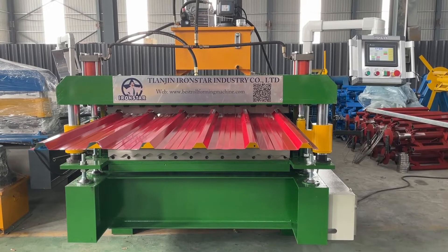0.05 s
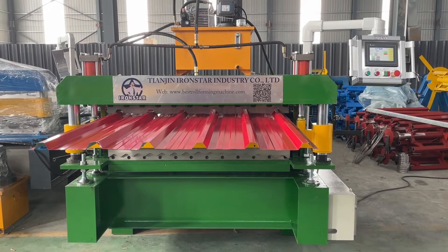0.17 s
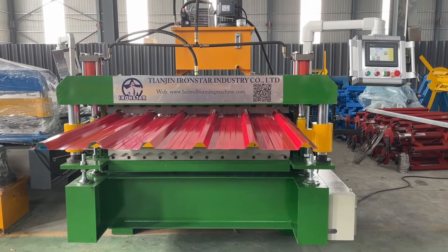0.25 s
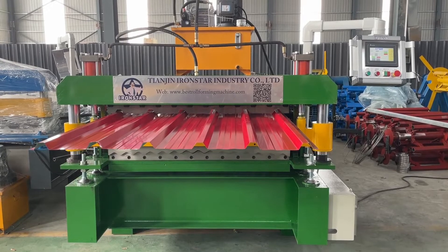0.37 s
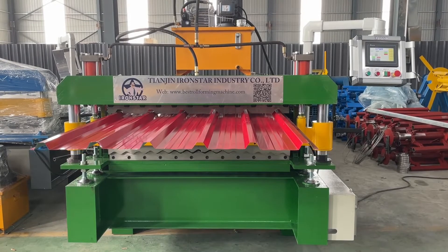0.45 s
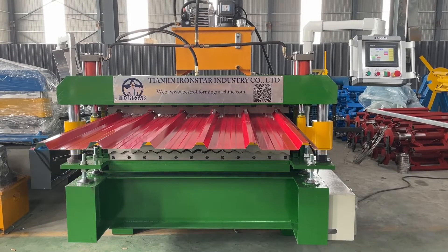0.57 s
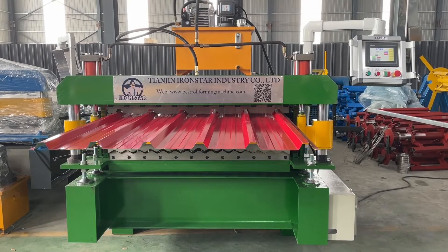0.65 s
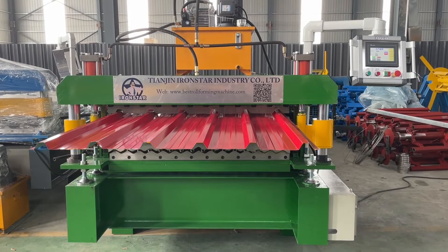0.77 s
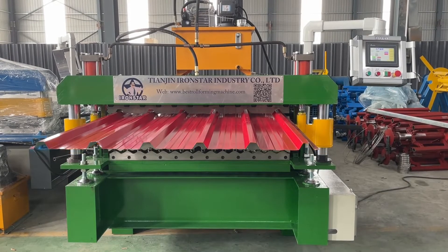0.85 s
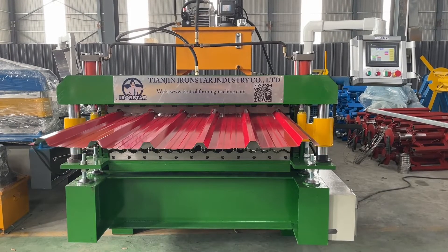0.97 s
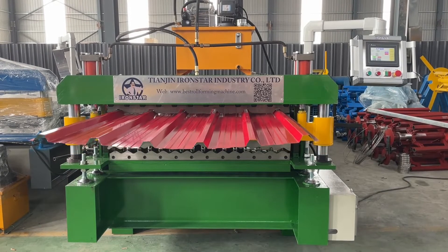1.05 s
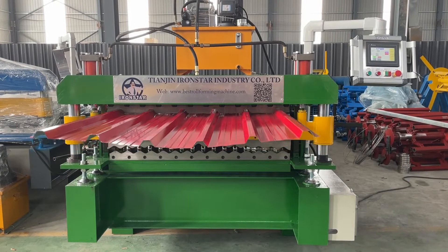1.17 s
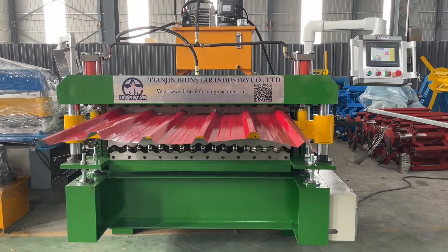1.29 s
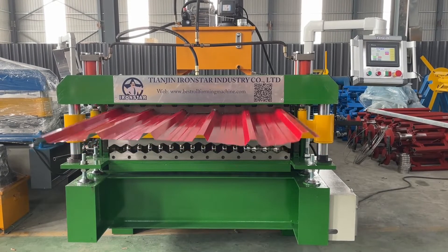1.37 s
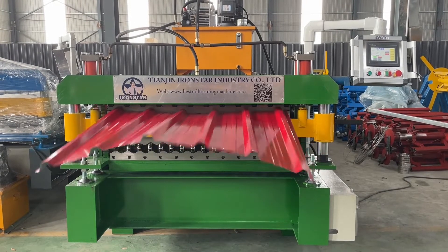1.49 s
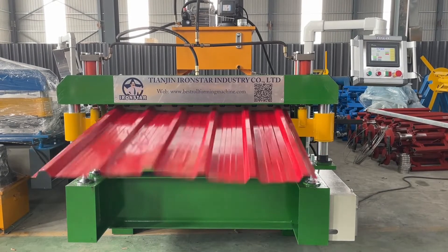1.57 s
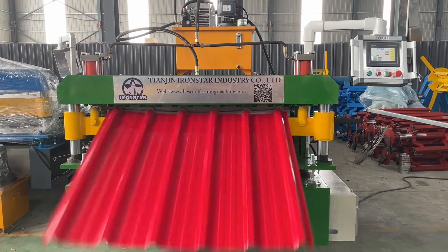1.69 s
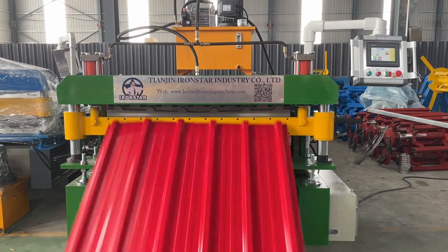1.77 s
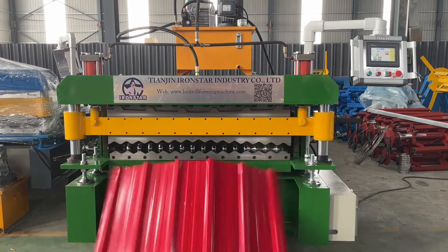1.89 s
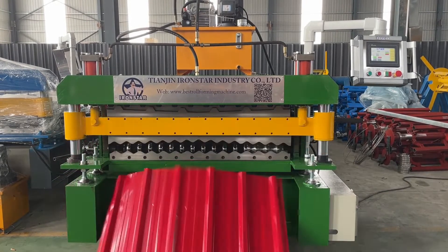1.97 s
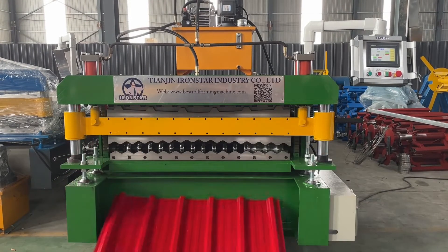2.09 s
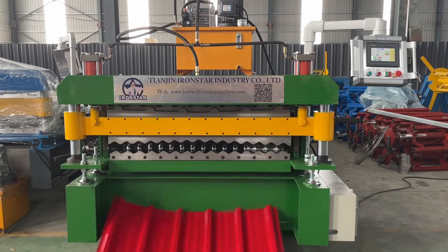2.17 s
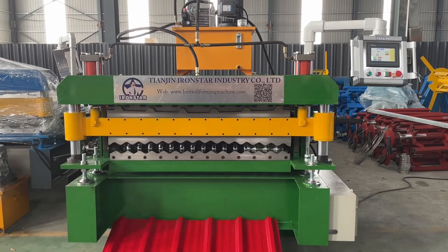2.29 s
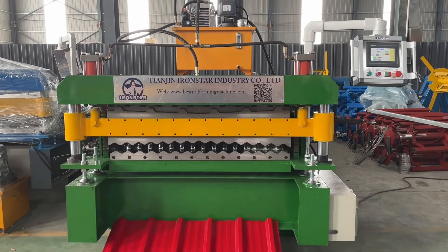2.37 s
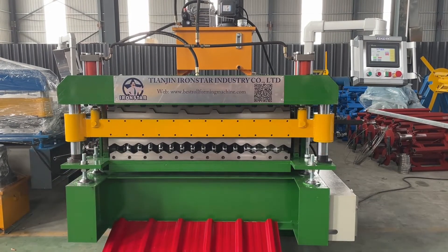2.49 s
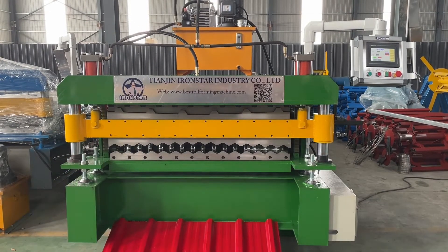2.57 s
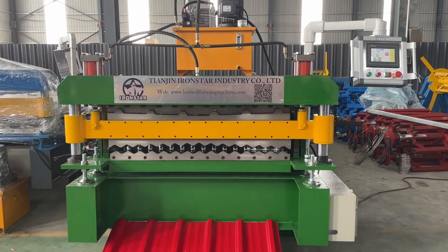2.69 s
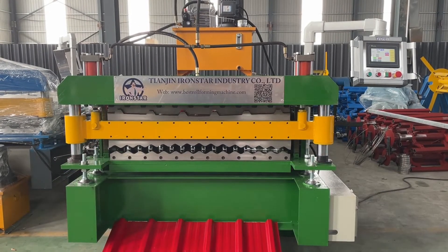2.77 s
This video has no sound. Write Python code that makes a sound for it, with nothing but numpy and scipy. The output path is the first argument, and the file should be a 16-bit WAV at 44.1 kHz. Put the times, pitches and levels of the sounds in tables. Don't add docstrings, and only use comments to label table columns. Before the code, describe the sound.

A thin steel roofing panel drops off a humming forming machine, clattering and ringing in a factory hall

```python
import sys
import numpy as np
from scipy import signal
from scipy.fft import rfft, irfft, next_fast_len
from scipy.io import wavfile

SR = 44100
rng = np.random.default_rng(int(sys.argv[2]) if len(sys.argv) > 2 else 0)


def transcribe(u):
    v = np.clip(np.atleast_2d(u).T, -1, 1)
    q = np.round(v * 32767).astype(np.int16)
    wavfile.write(sys.argv[1], SR, q)


def boost_factor(decibels):
    exponent = np.asarray(decibels, float) / 20
    return 10 ** exponent


N = 125685


def rms_one(x):
    return x / np.sqrt(np.mean(x ** 2) + 1e-20)


def in_time(rows):
    s, *columns = np.transpose(rows)
    return [np.interp(np.arange(N) / SR, s, c) for c in columns]


def at_hz(rows, hz, column=1):
    rows = np.array(rows)
    return np.interp(np.log(hz), np.log(rows[:, 0]), rows[:, column])


def drift(rate):
    pole = np.exp(-80 * np.pi * rate / SR)
    white = rng.standard_normal(N // 40 + 2002)
    slow = signal.lfilter([1], [1, -2 * pole, pole * pole], white)[2000:]
    return np.interp(np.arange(N) / 40, np.arange(len(slow)), rms_one(slow))


def butter(x, hz, kind, order=2):
    return signal.sosfilt(signal.butter(order, hz, kind, fs=SR, output="sos"), x)


def ring(x, hz, t60):
    r = boost_factor(-60 / (max(t60, .01) * SR))
    w = 2 * np.pi * hz / SR
    return signal.lfilter([0, np.sin(w)], [1, -2 * r * np.cos(w), r * r], x + 1e-18)


# pitch_hz, panel_likeness, machine_likeness
LIKENESS = [(60, 1, 0.92), (205, 1, 1), (410, 0.94, 0.38), (770, 0.92, 0.47), (1600, 0.27, 0.087),
            (3000, 0.75, 0.82), (8000, .98, .98), (15800, 0.93, 0.66)]


def bands(size, column):
    edges = 32 * 2 ** np.arange(0, 9.3, .5)
    white = rng.standard_normal((2, 2, size))
    for k, (low, high) in enumerate(zip(edges, edges[1:])):
        mid, side = butter(white[k % 2], [low, high], "band")
        hz = np.sqrt(low * high)
        alike = np.clip(at_hz(LIKENESS, hz, column=column), 0, 1)
        yield hz, np.sqrt(1 + alike) * mid + np.sqrt(1 - alike) * side * [[1], [-1]]


# time_s, noise_db, rumble_db
DRIVE_LOAD = [(0, -31.5, -34), (.15, -32.5, -31), (.24, -32, -33), (.4, -32, -32), (.7, -32, -26),
              (.9, -32, -33.5), (1.07, -30.5, -33), (1.2, -28, -26), (1.5, -23.5, -40.5), (1.9, -37.5, -34),
              (2.3, -34, -43), (2.55, -31, -66), (2.85, -42.5, -50)]
# pitch_hz, density_db (per Hz)
MACHINE_COLOUR = [(100, -7.5), (250, -3.5), (600, -6), (1300, -8.5), (3000, -17.5), (6000, -24.5),
                  (9000, -17), (16000, -25.5)]
# pitch_hz, width_hz, level_db, slope_db_per_s
GEARS = [(168, 9.6, -35.5, -3), (565.5, 15.5, -48.5, 8.5), (622.7, 4.6, -38, -12), (736, 14, -54.5, 0),
         (2190, 250, -40.5, -21), (3890, 38, -75, 16), (4330, 10, -47.5, -23)]


def machine():
    noise_db, rumble_db = in_time(DRIVE_LOAD)
    together, t = drift(1.0), np.arange(N) / SR
    hiss = 0
    for hz, band in bands(N, column=2):
        hiss = hiss + boost_factor(at_hz(MACHINE_COLOUR, hz) + 0.18 * together + 1.7 * drift(28)) * band
    hiss = rms_one(butter(hiss, 95, "high")) * boost_factor(noise_db)

    mid, side = butter(rng.standard_normal((2, N)), [55.5, 109.8], "band", order=3)
    lumps_db = 1 * drift(17.0)
    rumble = rms_one(mid + 0.032 * side * [[1], [-1]]) * boost_factor(rumble_db + lumps_db)

    tones = 0
    for hz, width_hz, db, slope_db in GEARS:
        mid, side = ring(rng.standard_normal((2, N)), hz, 1.8 / width_hz)
        level = boost_factor(db + slope_db * np.minimum(t, 1.1))
        tones = tones + level * rms_one(mid + 0.2 * side * [[1], [-1]])
    return hiss + rumble + tones * boost_factor(noise_db - noise_db[0])


# time_s, level_db
PUMP_LEVEL = [(0, -41.5), (.19, -45), (.25, -33.5), (.42, -31.5), (.7, -31.5), (.9, -33), (1.09, -32),
              (1.13, -26.5), (1.2, -43)]
# multiple, level_db (against the note)
PUMP_ORDERS = [(2.0, -20), (3.07, -14.5), (9.0, -21)]
PUMP_HZ, PUMP_WOBBLE_HZ, PUMP_FLUTTER_DB = 319.8, 1.32, .8


def pump():
    db, = in_time(PUMP_LEVEL)
    phase = 2 * np.pi * np.cumsum(PUMP_HZ + PUMP_WOBBLE_HZ * drift(7.9)) / SR
    note = np.sin(phase)
    for multiple, order_db in PUMP_ORDERS:
        note = note + boost_factor(order_db + 2 * drift(4.5)) * np.sin(multiple * phase)
    return np.sqrt(2) * note * boost_factor(db + PUMP_FLUTTER_DB * drift(34.0))


# start_s, pitch_hz, level_db, t60_s
KNOCKS = [(1.1, 254.7, -20, 0.38), (1.115, 140.4, -20, 0.33), (1.17, 263, -19.5, 0.59),
          (1.175, 148.6, -19, 0.37), (1.17, 760, -28, 0.16), (1.214, 107, -17, 0.22), (1.15, 49, -28, 0.91),
          (1.25, 768, -19, 0.21), (1.262, 224, -11, 0.16), (1.27, 651, -21, 0.21), (1.275, 357.4, -20, .2),
          (1.27, 976, -28, .25), (1.3, 276.6, -20.5, 0.27), (1.29, 2900, -22.5, 0.21),
          (1.365, 222, -25, 0.37), (1.405, 207.8, -16.5, 0.33), (1.42, 70, -24, 0.45),
          (1.425, 716, -18, 0.19), (1.42, 1104, -20, 0.18), (1.43, 480, -21, 0.27),
          (1.44, 214, -19.5, 0.23), (1.51, 703, -25, .5), (1.505, 207, -21.5, 0.22),
          (1.545, 409.5, -13, .13), (1.55, 137.6, -18, 0.17), (1.578, 331.4, -10, 0.11),
          (1.575, 1066, -14.5, 0.14), (1.575, 833, -17, .2), (1.61, 1095, -21, 0.2),
          (1.655, 552, -21, 0.41), (1.66, 145.6, -21, 0.246), (1.665, 1408, -23, 0.36),
          (1.715, 2960, -28, .1), (1.765, 626, -26, 0.35), (1.82, 246.5, -32.5, 1),
          (1.881, 134.4, -26.5, 0.71), (1.968, 233, -12, 0.18), (1.975, 93.6, -25, 0.66),
          (1.97, 836, -20, 0.21), (1.995, 738, -11, 0.18), (2.02, 1057, -19, 0.5), (2.04, 2960, -18, 0.1),
          (2.07, 724, -20.5, 0.26), (2.14, 169, -22.5, 0.16), (2.135, 819, -19, 0.31),
          (2.14, 1087, -25, 0.35), (2.175, 243.2, -15, 0.2), (2.185, 1029, -19.5, 0.46),
          (2.225, 698, -19.5, 0.67), (2.31, 706, -20, 0.52),
          (1.247, 2650, -15, 0.13), (1.247, 1230, -19, 0.13), (1.275, 2080, -26, 0.14), (1.3, 1390, -22, .2),
         (1.425, 2075, -25, 0.13), (1.968, 2570, -35, 0.084), (1.971, 4100, -18.5, 0.11),
         (2.001, 1850, -25, 0.23), (2.015, 2960, -24, .1), (2.23, 1132, -19.5, .2), (2.24, 4240, -24, .2),
         (2.27, 2070, -23, .2), (2.269, 992, -19.5, 0.31), (2.31, 2600, -21, .15), (2.335, 1100, -23, 0.68),
         (2.45, 1100, -22, 0.41), (2.66, 994, -33, .25), (.585, 88, -29, .3), (0.669, 91, -26, .4),
         (.79, 88, -25, .3)]
KNOCK_RISE_S, KNOCK_DB, KNOCK_ROUGH = 0.0052, 4, 0.5


def knocks():
    waver, out = drift(44.5), np.zeros(N + 2 * SR)
    for k, (s, hz, db, t60) in enumerate(KNOCKS):
        t = np.arange(int(np.clip(t60, .02, 1) * SR)) / SR
        rough = 1 + KNOCK_ROUGH * waver[2477 * k % (N - SR):][:len(t)]
        swell = 1 - np.exp(-(t / KNOCK_RISE_S) ** 2)
        tone = np.sin(2 * np.pi * (hz * t + rng.random()))
        i = int(s * SR)
        out[i:i + len(t)] += boost_factor(KNOCK_DB + db - 60 * t / t60) * swell * rough * tone
    return out[:N]


def grains():
    size_db = 3.5 * np.minimum(rng.exponential(1, N), 3.6)
    sizes = boost_factor(size_db) * rng.choice([-1, 1], N)
    return rms_one(sizes * (rng.random(N) < 1800 / SR))


# start_s,
# level_db, # rise_s, boom_db, sizzle_db (last two against the level)
CONTACTS = [(0.193, -35.5, 0.017, 2.5, -7), (1.081, -20, 0.0027, -1.5, 3), (1.1, -33.5, 0.011, 3, -20),
            (1.168, -31.5, 0.0069, 8.5, -23), (1.225, -42, .004, 8, -15), (0.437, -41, .002, -5, -14),
            (1.245, -17.5, 0.0011, 4, -11), (1.265, -18, 0.03, -1, 2.5), (1.297, -29.5, 0.0073, -7, 3),
            (1.35, -35.5, 0.0054, 4.5, -7), (1.403, -20.5, 0.0032, 4, 1.5), (1.421, -29, 0.021, 2.5, 13.5),
            (1.434, -30, 0.0022, -22, -6), (1.501, -28.5, 0.0064, 7.5, -11), (1.543, -24.5, 0.015, 5, 4.5),
            (1.578, -20.5, 0.0063, 5, 2), (1.604, -36, 0.004, 3.5, -3), (1.66, -26, 0.0034, 4.5, -8),
            (1.721, -39.5, 0.0041, 17.5, -37), (1.963, -11.5, 0.0052, -6, 0.5),
            (2.001, -17.5, 0.0079, -0.5, -41), (2.049, -21.5, 0.0045, 2, -30),
            (2.076, -25, 0.0068, 4.5, -18), (2.105, -27.5, 0.0047, 6, -15), (2.133, -20, 0.017, 4, -2.5),
            (2.177, -20.5, 0.0074, -3, -18), (2.213, -16.5, 0.044, -0.5, -4),
            (2.291, -26.5, 0.014, 2.5, 7.5), (2.322, -26, 0.0042, 3, -3), (2.346, -26, .006, -2, -1),
            (2.4, -26.5, 0.024, 4, 1), (2.46, -27.5, 0.028, -2, -2), (2.674, -33.5, 0.0045, -0.5, 5)]


def feeds(db, fall_s):
    s, _, rise = np.transpose(CONTACTS)[:3, :, None]
    t, rise = np.arange(0, N, 8) / SR - s, np.maximum(rise, .001)
    build = np.sin(np.pi / 2 * np.clip(t / rise, 0, 1)) ** 2
    return boost_factor(db)[:, None] * build * np.exp(-np.maximum(t - rise, 0) / fall_s)


def full_rate(v):
    return np.repeat(v, 8)[:N]


# pitch_hz, sheet_t60_s, hall_t60_s
RING = [(58, 0.12, 0.5), (243, 0.43, 1.15), (720, 0.26, 2.56), (2310, 0.17, 2.1), (5350, 0.28, 1.47),
        (13800, 0.12, .5)]
# pitch_hz, density_db (per Hz)
PANEL_COLOUR = [(45, -10), (200, -11), (400, -10), (1400, -6), (1570, -11), (3000, -14.5), (4100, -23),
                (7500, -20.5)]
HALL_DB, HALL_BUILD_S, CRACK_DB = -11, 0.025, 0


def sheet_in_hall():
    size = 2 * SR
    t, body = np.arange(size) / SR, 0
    for hz, band in bands(size, column=1):
        sheet, hall = at_hz(RING, hz), at_hz(RING, hz, column=2)
        tail = boost_factor(-60 * t / sheet) + boost_factor(HALL_DB - 60 * t / hall) * (1 - np.exp(-t / HALL_BUILD_S))
        body = body + band * tail / np.sqrt(np.sum(tail ** 2))
    body[:, 0] += boost_factor(CRACK_DB) * np.sqrt(np.sum(body ** 2) / 2)
    lead = np.roll(body, 2048, axis=1)
    colour = boost_factor(at_hz(PANEL_COLOUR, np.arange(1, size // 2 + 2) * SR / size))
    body = irfft(rfft(lead) * colour, size)
    return body / np.sqrt(np.sum(body ** 2) / 2)


# pitch_hz, level_db, t60_s
SHEET_MODES = [(244.6, -6, 0.66), (544, -6.5, 0.95), (633.4, -6.5, 0.69), (740, -5, 1), (820, -9, 0.96),
               (1020, -6, 0.34), (1092, -3.5, 0.7), (1220, -15, 0.36), (1408, -14, 0.78),
               (2098, -7.5, 0.35), (2960, -16, 0.54), (6060, -12.5, 0.041), (4220, -26, 0.13),
               (2570, -9.5, 0.16)]
MODES_DB, MODE_SCATTER_DB, PANEL_DB = -10.5, 2.0, 8
BOOM_LOW_HZ, BOOM_HZ, SIZZLE_HZ = 70, 1670, 5700
RATTLE_S, BOOM_S, SIZZLE_S = 0.02, 0.024, 0.015


def panel():
    _, db, _, boom_db, sizzle_db = np.transpose(CONTACTS)
    rattle, boom = feeds(db, RATTLE_S), feeds(db + boom_db, BOOM_S)
    sizzle = feeds(db + sizzle_db, SIZZLE_S)
    force = butter(grains() * full_rate(boom.sum(0)), [BOOM_LOW_HZ, BOOM_HZ], "band")
    force += butter(grains() * full_rate(rattle.sum(0)), [BOOM_HZ, SIZZLE_HZ], "band")
    force += butter(grains() * full_rate(sizzle.sum(0)), SIZZLE_HZ, "high")
    out = signal.fftconvolve(force[None], sheet_in_hall(), axes=1)[:, 2048:N + 2048]

    scatter, drive = rng.standard_normal((len(db), len(SHEET_MODES))), grains()
    for k, (hz, level_db, t60) in enumerate(SHEET_MODES):
        feed = full_rate(boost_factor(MODE_SCATTER_DB * scatter[:, k]) @ (boom if hz < BOOM_HZ else rattle))
        mode = ring(np.roll(drive, 997 * k) * feed, hz, t60) / np.sqrt(t60 * SR / 10)
        out += boost_factor(MODES_DB + level_db) * mode
    return boost_factor(PANEL_DB) * out


def scene():
    return machine() + pump() + panel() + knocks()


def top_cut(x):
    return signal.sosfilt(signal.butter(12, 16190, fs=SR, output="sos"), x)


# pitch_hz, left_lead_rad, left_minus_right_db, colour_db
PORTS = [(57, 0.26, 0, -3), (228, 0, -2.5, 3), (1260, 0.6, 1, -1.5), (1780, 0.47, 0.5, -1.5),
         (5140, 1.04, 2, 3), (8250, -3.14, 0, -1), (10640, -5.5, -2.5, -20), (14100, -8.5, -.5, -12.5)]
CEILING, CUTOFF_HZ = 1.02, 16150


def record(dry):
    size = next_fast_len(N + 4096)
    hz = np.maximum(np.arange(size // 2 + 1) * SR / size, 1)
    side = np.array([[.5], [-.5]])
    port_db = side * at_hz(PORTS, hz, column=2) + at_hz(PORTS, hz, column=3)
    ports = np.exp(1j * side * at_hz(PORTS, hz)) * boost_factor(port_db)
    x = irfft(rfft(dry, size) * ports, size)[:, :N]
    x = CEILING * np.tanh(x / CEILING)
    x = signal.sosfilt(signal.cheby2(18, 60, CUTOFF_HZ, fs=SR, output="sos"), x)
    return top_cut(x)


dry = scene()
out = record(dry)
transcribe(out)
```